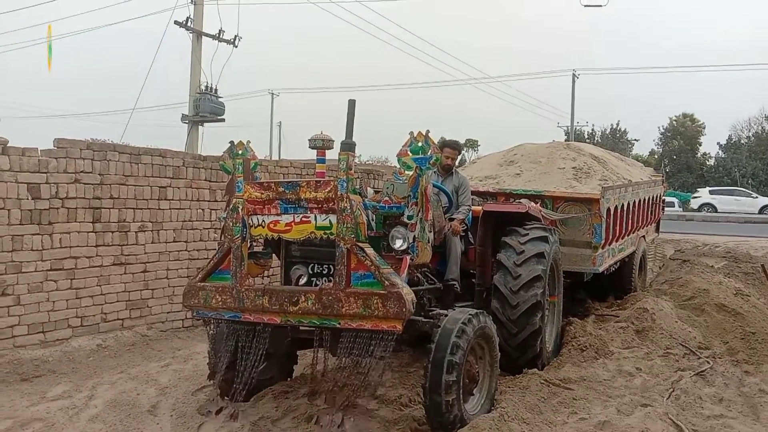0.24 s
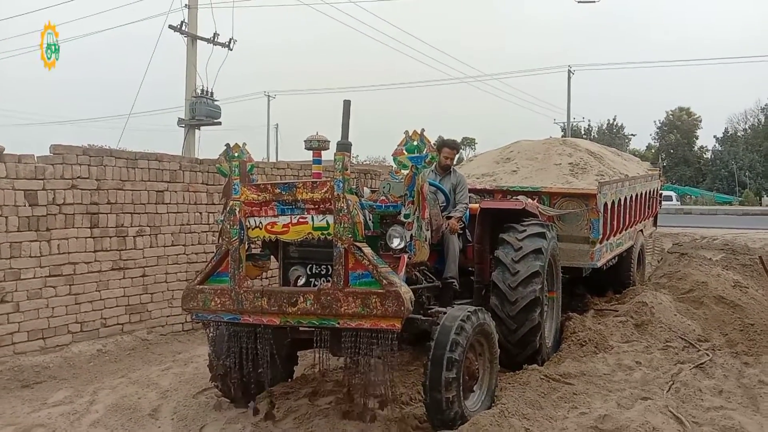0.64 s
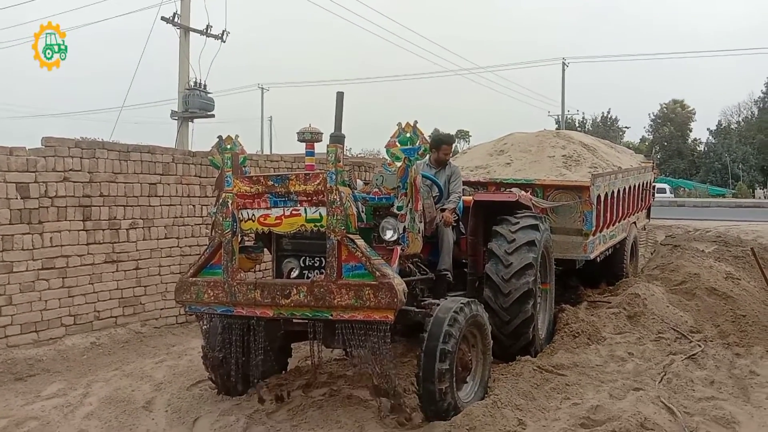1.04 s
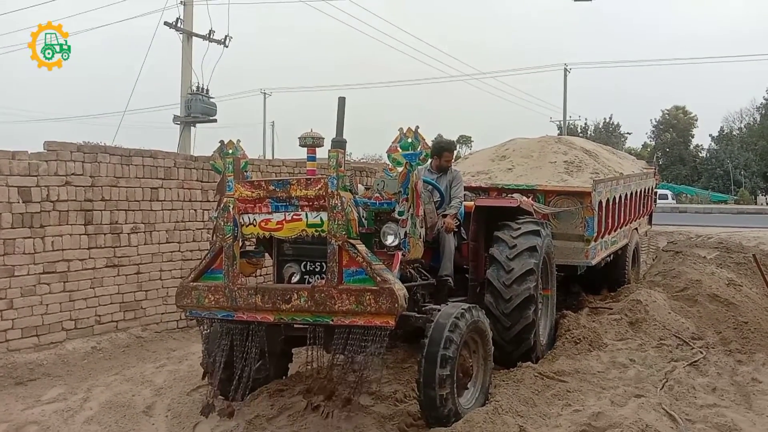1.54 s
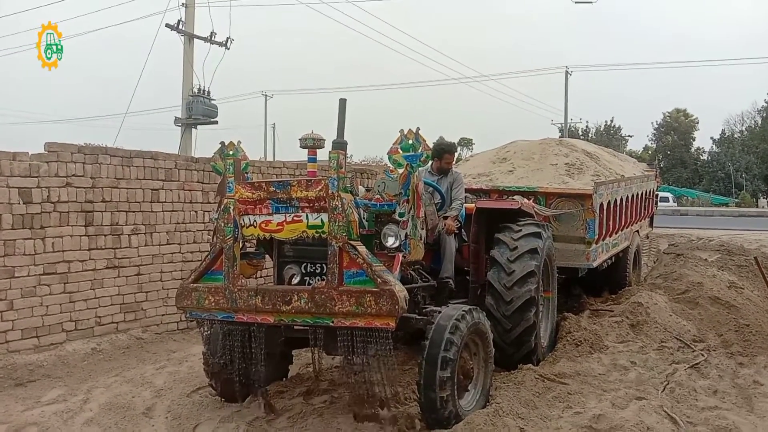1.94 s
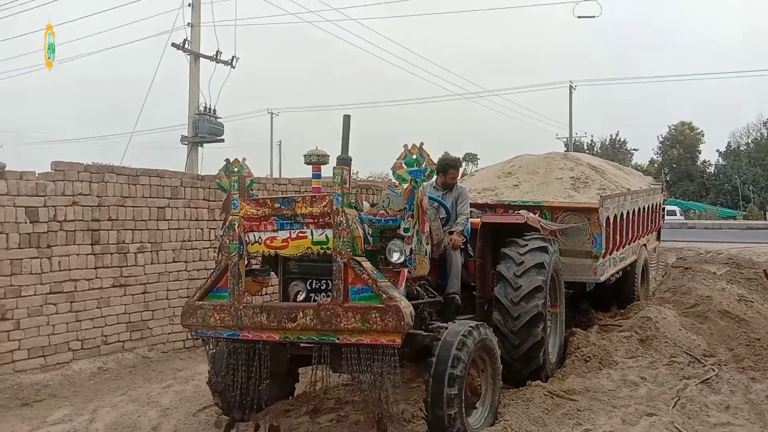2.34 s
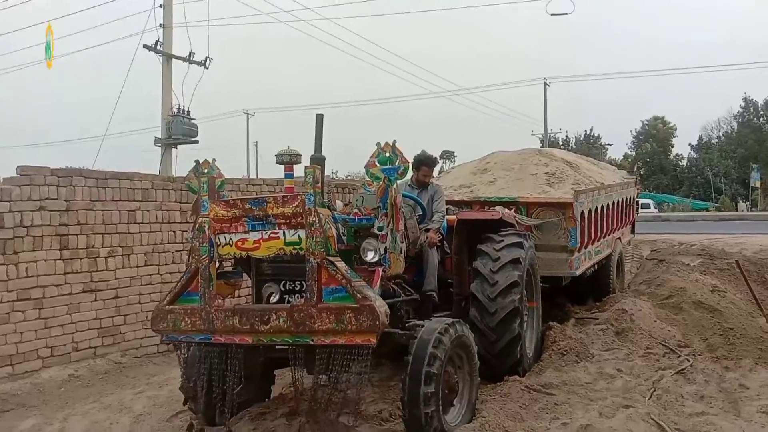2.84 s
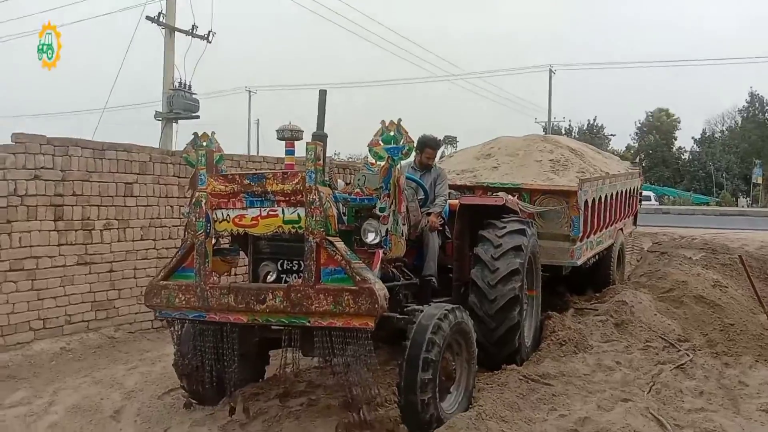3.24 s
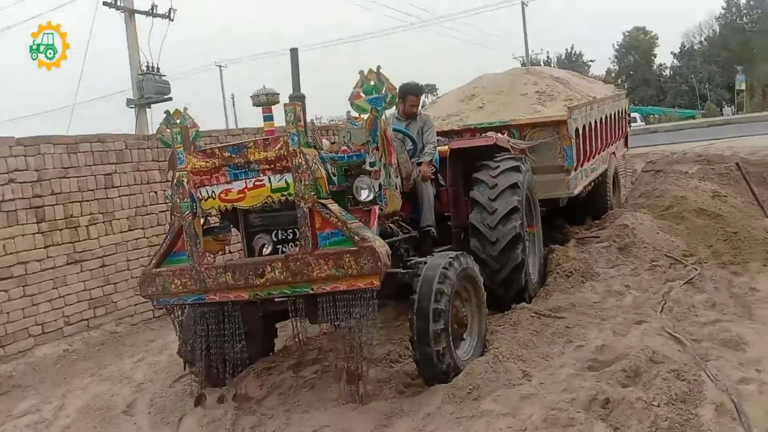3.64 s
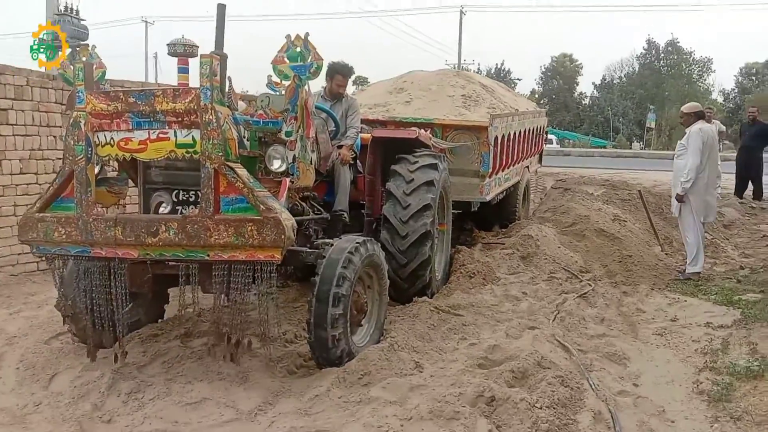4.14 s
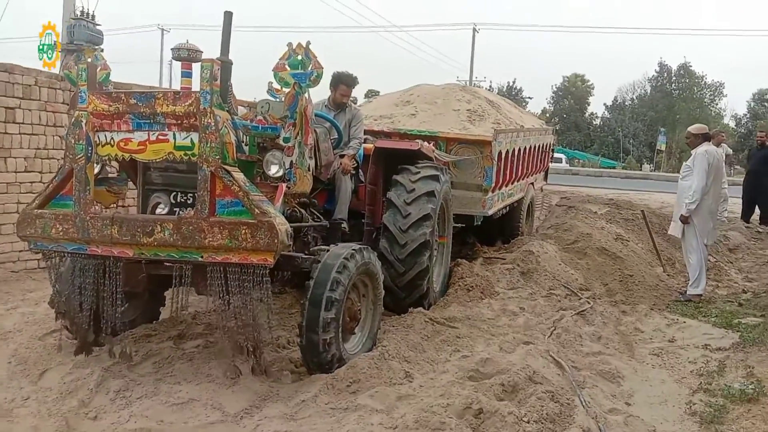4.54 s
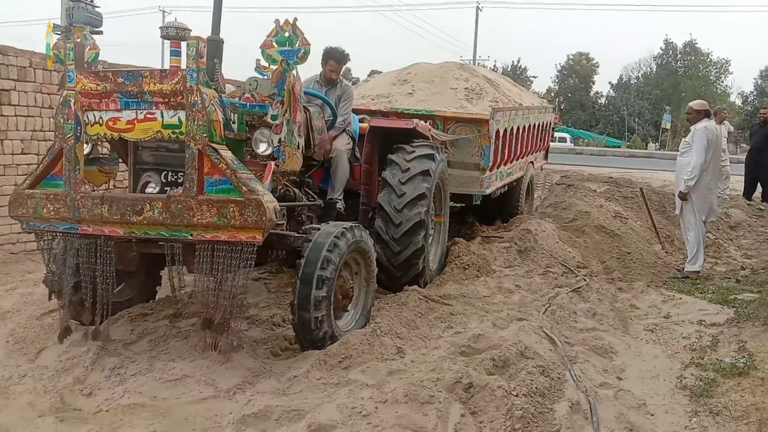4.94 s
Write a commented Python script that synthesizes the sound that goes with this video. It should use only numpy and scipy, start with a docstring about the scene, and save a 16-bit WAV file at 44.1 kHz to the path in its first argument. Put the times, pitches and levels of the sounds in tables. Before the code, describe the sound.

Two rough diesel engine surges outdoors, the second shorter and more abrupt, with dangling chains hissing, rattling and tinkling between and after them.

```python
"""Open sand: a tractor diesel surges twice against a loaded trailer, sinking away each time.
Exhaust: gliding harmonic note, upper overtones shaped by the stack. Block and bonnet: banded noise
with panel resonances. Bumper chains: shaken hiss and stray touches, plus separate ringing clinks.
Brief swelling tones, dull thuds and a faint wash of noise complete the scene."""
import sys
import numpy as np
from scipy import signal
from scipy.fft import rfft, irfft, next_fast_len
from scipy.io import wavfile
from scipy.ndimage import uniform_filter1d

SR = 44100
rng = np.random.default_rng(int(sys.argv[2]) if len(sys.argv) > 2 else 0)


def waveform_to_disk(signal):
    """Save audio, clipped to [-1, 1], as 16-bit WAV at the path in sys.argv[1]."""
    frames = np.transpose(np.atleast_2d(signal))
    scaled = np.clip(frames, -1, 1) * 32767
    samples = np.round(scaled).astype(np.int16)
    wavfile.write(sys.argv[1], SR, samples)


N = 228438

# Exhaust note, one table per surge: time_s, pitch_hz, note_rms_db, octave_rms_db, each_overtone_db (before STACK_RESPONSE)
NOTE_TABLES = [
    [(0.0, 160.7, -35.5, -46, -49), (0.044, 158.4, -27.5, -47, -46), (0.098, 179.5, -26, -52, -48),
     (0.15, 185.8, -19, -56, -46), (0.24, 194.5, -26, -54, -38), (0.348, 184.4, -23, -49, -38),
     (0.46, 178.2, -19.5, -62, -33), (0.54, 171.9, -23, -41.5, -28), (0.614, 163.7, -28.5, -64, -31),
     (0.77, 154.1, -26.5, -37.5, -28), (0.84, 150.8, -30.5, -54.5, -43), (0.92, 149, -32, -47, -35),
     (1.0, 140.7, -38, -56, -50), (1.1, 131.4, -45, -58, -56)],
    [(3.63, 194.3, -59, -62, -45), (3.666, 166, -37, -57, -27), (3.74, 156, -39, -50, -32.5),
     (3.772, 166, -26.5, -60, -24), (3.86, 178.6, -31.5, -64, -34), (3.95, 184, -47, -57, -52),
     (4.056, 180, -22.5, -43.5, -27), (4.15, 182, -45.5, -59, -48), (4.24, 189, -60, -62, -47)],
]
# Brief dips of the note's fundamental; octave and overtones carry on: centre_s, depth_db, half_width_s (to 1/e)
NOTE_DIPS = [(0.19, -14, 0.031), (0.586, -25, 0.015), (0.95, -9, 0.014), (3.813, -39, 0.016),
             (4.008, -20, 0.029)]
# Stack response to the upper overtones: frequency_hz, gain_db
STACK_RESPONSE = [(400, -26), (580, -10), (750, -23), (930, -18), (1100, -12), (1250, -38), (1500, -4.5)]
# Engine load as heard: time_s, roar_db, then over the roar: rumble_db, growl_db, clatter_db
ENGINE_LOAD = [(0.0, -29.5, -9, -10, -2), (0.17, -26.5, -14.5, -8, -4), (0.46, -33, -3, -7, -4.5),
               (0.62, -31, -8.5, -10, -5.5), (0.97, -38.5, -10, -5.5, -2.5), (1.06, -35.5, -5.5, -18.5, -4),
               (1.35, -38.5, -12, -18.5, -7.5), (1.75, -46, -14, -12.5, -6.5), (2.1, -54, -6, -7.5, -6.5),
               (2.5, -63.5, -14, -6, 0), (2.85, -71.5, -16, -1.5, 2.5), (3.3, -65.5, -24, -3.5, 3),
               (3.607, -65.5, -19, -19, 14.5), (3.611, -26, -25, -11.5, 3), (3.69, -29, -7.5, -3, -9),
               (3.87, -30, -6, -2, -4.5), (3.96, -27, -14.5, -5.5, -3.5), (4.12, -27.5, -13, -5.5, -10),
               (4.2, -36.5, -10, -7, -6.5), (4.245, -33, -25, -15, -8), (4.28, -38, -16, -9, -8),
               (4.4, -43, -1, -2.5, -6), (4.45, -41.5, -9, -2.5, -6), (4.55, -44, -11, -6.5, -10.5),
               (4.63, -53.5, -1, 6.5, -10), (4.7, -43, -10.5, -6, -4), (4.78, -48, -10, -3, -8.5),
               (4.84, -57.5, -1, 1.5, 5.5), (4.9, -51.5, -20, -7, -5.5), (5.18, -69.5, -19, 3, 0.5)]
# Roar spectrum before levelling by band: frequency_hz, relative_db_per_hz
ROAR_SPECTRUM = [(18, -74), (30, -34), (106, -2.5), (175, 8.5), (297, -13.5), (579, -12.5), (1100, 8),
                 (1270, 5.5), (1650, 5), (1950, -5), (2420, -14.5), (3550, -12.5), (4960, -28.5),
                 (6140, -48.5), (9000, -54), (11700, -51), (19800, -120)]
# Block and bonnet resonances: frequency_hz, width_hz, gain_over_roar_db
PANEL_MODES = [(136.6, 224, -7.5), (580.4, 90, 10), (972, 46, 7.5), (1260, 118, 13), (1878, 144, 12.5),
               (3086, 500, 3.5), (3800, 120, 2.5), (4827, 47, 12.5), (5470, 680, 8), (2555, 73, -3),
               (6870, 64, 17.5)]
# Chain shaking, rising and falling: time_s, level_db
CHAIN_SHAKE = [(0.0, -26.5), (0.24, -22), (0.47, -28), (0.97, -33.5), (1.0, -30), (1.15, -29),
               (1.34, -34.5), (1.55, -36), (1.62, -39), (1.68, -44.5), (2.15, -46.5), (2.22, -41),
               (2.36, -47.5), (2.8, -53.5), (3.1, -65), (3.19, -68), (3.35, -55), (3.41, -67),
               (3.48, -43.5), (3.58, -51), (3.63, -38), (3.7, -55), (3.92, -38), (4.1, -53), (4.6, -57),
               (4.73, -51), (5.18, -60)]
# Chain hiss spectrum before levelling: frequency_hz, relative_db_per_hz
RATTLE_SPECTRUM = [(1470, -35), (2500, -21), (3080, -25), (4220, -0.5), (5530, 7.5), (6410, -10),
                   (7080, 4.5), (8010, -31), (8520, -7), (11700, 0), (13800, -3.5), (14900, -10),
                   (15800, 20)]
# Chain link modes: frequency_hz, width_hz (unused), weight_db (scaled down in use)
LINK_MODES = [(2646, 16, -12), (3020, 99, -56), (3700, 16, -51), (3930, 51, -1), (3940, 47, -43),
              (5070, 13, -37), (4750, 73, 14), (5570, 19, 1), (6200, 18, -73), (6000, 11.7, 19),
              (6680, 17, -10), (7445, 17, -9.5), (7900, 27, -71), (8200, 15, -38), (8810, 43, 11),
              (9550, 31, 2), (10300, 26, 21), (10900, 220, 9), (11600, 29, -38), (11500, 43, 29),
              (10800, 27, -27), (13600, 110, 7), (14000, 190, -67), (14600, 32, -40), (13900, 48, 7),
              (14900, 76, -13), (14100, 230, 26), (15400, 95, 0)]
# Single clinks: start_s, level_db, low_hz, low_db, mid_hz, mid_db, high_hz, high_db, low_and_mid_t60_s;
# ring dB relative to the clink level, the high ring before its trim
CLINK_EVENTS = [(0.2484, -22, 3650, -9, 5010, -27, 14700, -6, 0.15),
                (0.3584, -21.5, 2970, -18, 6030, -9.5, 14700, -16, 0.15),
                (0.4873, -20, 3300, -6, 4606, -17, 10600, -26, 0.11),
                (0.7968, -24, 3920, -14, 5140, -13, 14800, -8.5, 0.2),
                (0.987, -23, 2734, -9.5, 6950, -22, 15600, -11.5, 0.16),
                (1.137, -19.5, 2800, -21, 5350, -8, 15300, -13, 0.11),
                (1.2984, -29, 2880, -15, 5640, -15, 11800, -8, 0.12),
                (1.421, -31, 3820, -19, 6270, -14.5, 11900, -8, 0.3),
                (1.5861, -25, 3095, -14, 5730, -16, 11700, -7.5, 0.18),
                (1.6084, -29.5, 3000, -18, 5660, -5.5, 14600, -13, 0.11),
                (1.704, -38, 3340, -9, 5490, -13, 11700, -18, 0.14),
                (1.7687, -38.5, 3880, -16, 6400, -15, 15000, -11, 0.19),
                (1.9102, -12, 3620, -12.5, 6590, -12.5, 14800, -10, 0.067),
                (1.9766, -37, 2450, -19, 4980, -16, 15200, -7, 0.13),
                (2.0485, -39, 3900, -14, 5700, -21, 15200, -6, 0.15),
                (2.088, -39, 3380, -22, 5530, -11.5, 10000, -6, 0.2),
                (2.166, -38.5, 3240, -21, 5400, -3.5, 10900, -16, 0.28),
                (2.1834, -32.5, 2630, -24, 5510, -11.5, 12000, -6.5, 0.35),
                (2.2276, -31, 3880, -38, 5670, -7.5, 12360, -5, 0.26),
                (2.2648, -27.5, 3140, -28, 5440, -3.5, 10600, -14, 0.078),
                (2.2982, -37.5, 3120, -21, 5630, -14, 14600, -7, 0.13),
                (2.379, -34.5, 3360, -18, 7280, -7, 14700, -6.5, 0.069),
                (2.3987, -33, 2683, -6.5, 6150, -34, 14700, -6, 0.39),
                (2.4234, -35.5, 3650, -3, 6670, -24, 8720, -21, 0.15),
                (2.4534, -32, 3620, -6, 5070, -18, 15000, -21, 0.18),
                (2.4982, -26, 3660, -18, 5130, -7, 14900, -9.5, 0.1),
                (2.6248, -42, 3730, -7, 5370, -12, 11600, -12, 0.074),
                (2.6485, -38.5, 4370, -18, 6900, -17, 11600, -6, 0.15),
                (2.708, -48, 4370, -3.5, 6100, -21, 12200, -15, 0.36),
                (2.7896, -42.5, 4270, -24, 5660, -12, 12100, -5, 0.18),
                (2.8449, -52, 2730, -11, 5750, -17, 15100, -17, 0.19),
                (2.9083, -41, 4100, -19, 5050, -5.5, 15000, -14, 0.2),
                (2.9634, -43.5, 3650, -12, 4860, -10, 10500, -8, 0.2),
                (3.0114, -46, 3900, -18, 6970, -12, 10500, -6, 0.099),
                (3.0426, -49, 2940, -19, 5030, -10, 14400, -9, 0.15),
                (3.0649, -40, 3650, -10.5, 5150, -11, 10800, -18, 0.12),
                (3.1584, -49.5, 2850, -2, 5140, -17, 14800, -23, 0.27),
                (3.209, -35, 3480, -14, 5080, -10.5, 14100, -10, 0.13),
                (3.245, -33.5, 3910, -16, 5560, -8, 9930, -15, 0.18),
                (3.3232, -38, 2750, -2, 5100, -9, 12100, -23, 0.069),
                (3.333, -30.5, 2750, -9, 5050, -21.5, 12500, -20, 0.22),
                (3.4465, -35.5, 3196, 2, 5430, -7.5, 11500, -14.5, 0.12),
                (3.5218, -40, 3260, -8, 5130, -17, 11100, -21, 0.12),
                (3.5414, -31.5, 3100, -11.5, 5400, -9, 11770, -20, 0.17),
                (3.6086, -14, 3122, -13, 4770, -12, 11700, -26.5, 0.1),
                (3.8642, -25, 3060, -17, 4820, -19, 14910, -17, 0.14),
                (4.1322, -27, 2814, -8, 4504, -26, 11500, -14, 0.15),
                (4.2009, -31.5, 3035, -5.5, 4700, -31, 10500, -33, 0.18),
                (4.366, -38, 4160, -7.5, 4900, -31, 9800, -24, 0.39),
                (4.4777, -35, 2500, -8, 5350, -15.5, 10960, -21, 0.13),
                (4.5106, -40.5, 3600, -5, 5510, -13, 8740, -34, 0.14),
                (4.6369, -35.5, 2610, -9, 5620, -13, 10700, -24, 0.3),
                (4.6584, -37, 2560, -6, 5500, -16, 15100, -13, 0.15),
                (4.6935, -34.5, 3120, -11.5, 5620, -23, 10050, -10.5, 0.18),
                (4.7242, -28, 2774, -10.5, 5100, -13.5, 10700, -14.5, 0.12),
                (4.8454, -31, 2680, -12, 5500, -18, 10400, -19, 0.12),
                (4.9287, -42.5, 3860, -9.5, 5500, -7.5, 15300, -17, 0.22),
                (4.966, -40.5, 3146, -9.5, 5520, -12, 11000, -20, 0.36)]
# Brief tones of engine orders, panels and chain links: centre_s, peak_db, pitch_hz, half_length_s
DRONE_EVENTS = [(0.22, -32, 588, 0.088), (0.237, -30.5, 735, 0.052), (0.308, -28, 1134, 0.027),
                (.6, -30, 1185, 0.097), (0.606, -35, 829, 0.13), (0.855, -37.5, 1257, 0.3),
                (1.046, -25.5, 1227, 0.03), (1.221, -43, 1925, 0.11), (1.314, -35, 1222, 0.082),
                (1.859, -37, 1263, 0.026), (3.144, -57.5, 1240, 0.033), (3.296, -56.5, 1270, 0.075),
                (1.945, -49.5, 1240, 0.09), (2.073, -49, 2010, 0.02), (3.339, -41.5, 3560, 0.011),
                (3.465, -49, 3770, .02), (4.425, -44, 644, 0.032), (4.655, -48, 3240, 0.021),
                (4.759, -51, 5140, 0.016), (2.469, -46.5, 4240, 0.033), (3.354, -57.5, 7300, 0.037),
                (3.595, -41, 3880, 0.013), (3.648, -34, 640, 0.058), (3.699, -33.5, 930, 0.044),
                (3.795, -33, 534.4, 0.069), (3.898, -19.5, 944, 0.017), (3.939, -33, 903, 0.074),
                (3.942, -26.5, 559, 0.044), (3.994, -22.5, 947, 0.021), (3.998, -33, 268.9, 0.061),
                (4, -29, 700, 0.033), (4.089, -32.5, 690, 0.06), (4.249, -41, 672, 0.034),
                (4.382, -43, 940, 0.085), (4.618, -43.5, 624, 0.04), (4.748, -39, 1273, 0.062),
                (4.851, -43.5, 4320, 0.011), (4.925, -51, 1273, 0.087)]
# Dull knocks: centre_s, rms_at_centre_db
THUD_EVENTS = [(2.71, -55), (4.2, -46), (4.63, -43.5)]
# Background wash before levelling: frequency_hz, relative_db_per_hz
QUIET_SPECTRUM = [(18, -48), (30, -8.5), (141, 9), (413, -7), (775, -12), (1120, -30), (1270, -2),
                  (2390, -31), (5120, -11.5), (8420, -48), (15800, -24)]

T, M = np.arange(N) / SR, next_fast_len(N)
FREQ_HZ = np.maximum(np.arange(M // 2 + 1) * SR / M, 1)


def undb(db):
    """Decibels to gain."""
    return 10 ** (np.asarray(db) / 20)


def level(x, rms_db):
    """Scale to an rms level."""
    return x * undb(rms_db) / np.sqrt(np.mean(x ** 2))


def columns(*tables):
    """Each column of the joined tables, interpolated to one value per sample."""
    time_s, *cols = np.concatenate(tables).T
    return [np.interp(T, time_s, col) for col in cols]


def colour(table, hz):
    """Table dB at these frequencies, interpolated over log frequency."""
    table_hz, db = np.transpose(table)
    return np.interp(np.log(hz), np.log(table_hz), db)


def walk(rate_hz):
    """Random levels held about 1 / rate_hz seconds and smoothed twice; spread near 1."""
    hold_ms = int(1000 / rate_hz)
    count = int(N / SR * rate_hz * 1.2) + 2
    held = np.repeat(rng.standard_normal(count), hold_ms)
    smooth = uniform_filter1d(uniform_filter1d(held, hold_ms), hold_ms)
    return 1.3 * np.interp(T * 1000, np.arange(len(held)), smooth)


def bands(shape_db, lo_hz, hi_hz, per_octave):
    """Coloured noise cut into overlapping triangular bands: yields (centre_hz, sound)."""
    noise = rfft(rng.standard_normal(M)) * undb(shape_db)
    octaves = np.log2(FREQ_HZ)
    steps = np.arange(int(per_octave * np.log2(hi_hz / lo_hz)) + 1)
    for hz in lo_hz * 2 ** (steps / per_octave):
        window = np.clip(1 - per_octave * np.abs(octaves - np.log2(hz)), 0, 1)
        yield hz, irfft(noise * window, M)[:N]


def rings(t, hz, db, t60_s, turn=0):
    """Modes that open within a few ms, beat as close pairs and die away; turn is phase in cycles."""
    decay = np.exp(-np.log(1000) * t / t60_s)
    attack = 1 - np.exp(-t / 0.0035)
    beat = 1 + 0.2 * np.cos(2 * np.pi * 0.0057 * hz * t)
    return undb(db) * decay * attack * beat * np.sin(2 * np.pi * (hz * t + turn))


def exhaust():
    """A clean note on the strongest engine order; overtones swell where they cross a stack resonance."""
    hz, note_db, octave_db, over_db = columns(*NOTE_TABLES)
    for s, depth_db, half_s in NOTE_DIPS:
        note_db = note_db + depth_db * np.exp(-((T - s) / half_s) ** 2)
    active = sum((T >= table[0][0]) & (T <= table[-1][0]) for table in NOTE_TABLES)
    gate = uniform_filter1d(active * 1., size=600)
    phase = 2 * np.pi * np.cumsum(hz * (1 + 0.0033 * walk(40))) / SR
    over = 0
    for k in range(3, 9):
        gain = undb(colour(STACK_RESPONSE, k * hz) + 2.2 * walk(15))
        over = over + gain * np.sin(k * phase + 0.047 * walk(22))
    low = undb(note_db) * np.sin(phase) + undb(octave_db) * np.sin(2 * phase)
    return np.sqrt(2) * gate * (low + undb(over_db) * over), phase


def block(phase):
    """Combustion noise rings the panels, throbs with the exhaust note and comes in lumps, band by band."""
    roar_db, rumble_db, growl_db, clatter_db = columns(ENGINE_LOAD)
    lift = 1 + sum((undb(db) - 1) / (1 + (2 * (FREQ_HZ - hz) / width_hz) ** 2)
                   for hz, width_hz, db in PANEL_MODES)
    shape_db = colour(ROAR_SPECTRUM, FREQ_HZ) + 20 * np.log10(lift)
    parts = list(bands(shape_db, lo_hz=30, hi_hz=12000, per_octave=3))
    throb = 1 + .12 * np.cos(phase + walk(25))
    shared_db = .8 * walk(20)
    # the harder the clatter, the higher it reaches
    bright_db_per_octave = 1.9 * np.clip(clatter_db + 10.0, -6, 6.)
    # diesel knock roughens the upper bands
    knock = undb(1.49 * walk(220) + 0.2 * np.cos(phase / 3 + walk(15)))
    out = 0
    for lo_hz, hi_hz, db in ((0, 300, rumble_db), (300, 900, growl_db), (900, 2300, 0.), (2300, SR, clatter_db)):
        part = 0
        for hz, x in parts:
            if lo_hz <= hz < hi_hz:
                tilt_db = bright_db_per_octave * max(np.log2(hz / 4000), 0)
                part = part + x * undb(2.35 * walk(18) + shared_db + tilt_db)
        if lo_hz > 600:
            part = part * knock
        out = out + level(part, 0) * undb(db) * (throb if lo_hz else 1)
    return out * undb(roar_db)


def shaking():
    """Rattle level in dB: the changing shake plus a dying jolt after each clink, summed as power."""
    jolt_db, jolt_t60_s = -6., .1  # jolt level is over the clink's listed high ring
    power = undb(columns(CHAIN_SHAKE)[0]) ** 2
    for s, db, *_, high_db, _t60_s in CLINK_EVENTS:
        i = int(s * SR)
        t = T[i:i + SR // 4] - s
        decay_db = -60 * t / jolt_t60_s
        power[i:i + len(t)] += undb(db + high_db + jolt_db + decay_db) ** 2 * np.clip(t / .003, 0, 1)
    return 10 * np.log10(power)


def rattle(phase):
    """Many links touch at once: a hiss shaken by each firing, and stray touches that ring single modes."""
    shake_db = shaking()
    # the exhaust note is the third multiple of the firing rate
    firing = undb(3.5 * np.cos(phase / 3 + .4 * walk(12)))
    flutter = undb(0.4 * walk(70)) * firing
    parts = bands(colour(RATTLE_SPECTRUM, FREQ_HZ), lo_hz=2000, hi_hz=16100, per_octave=2)
    # the fewer links touch, the patchier the hiss
    patchy_db = np.clip(-.2 * (shake_db + 25), 1.5, 6)
    hiss = flutter * sum(x * undb(patchy_db * walk(40)) for _, x in parts)
    stray = np.zeros(N + SR)
    for when, which, size, force in rng.random(size=(1100, 4)):
        hz, _, weight_db = LINK_MODES[int(which * len(LINK_MODES))]
        t60_s = 840.0 / hz + 0.0052  # thin high modes die first
        i, t = int(when * N), np.arange(int(t60_s * SR / 2)) / SR
        touch_db = shake_db[i] + 0.083 * weight_db - 13.0 * force - 9.0
        stray[i:i + len(t)] += rings(t, hz * (1 + 0.0644 * (size - .5)), touch_db, t60_s)
    return undb(shake_db) * level(hiss, 0.065) + stray[:N]


def clinks():
    """Each clink: a tick, three main rings, and all the other link modes, at random levels, as it bounces."""
    high_t60_s, high_trim_db = 0.053, 2.5
    bounce_s, bounce_loss_db = 0.037, -13  # delay and loss of modes a full bounce late
    out, t = np.zeros(N + SR), np.arange(SR // 5) / SR
    short = SR // 14
    # two links meet
    mode_hz, _, mode_db = np.transpose(LINK_MODES + LINK_MODES)[:, :, None]
    chance = rng.random((len(CLINK_EVENTS), 4, len(mode_hz), 1))
    for (s, db, *row), (pick, turn, size, late) in zip(CLINK_EVENTS, chance):
        low_hz, low_db, mid_hz, mid_db, high_hz, high_db, t60_s = row
        main = rings(t, low_hz, low_db, max(t60_s, .02))
        main += rings(t, mid_hz, mid_db, max(t60_s, .02))
        main += rings(t, high_hz, high_db + high_trim_db, high_t60_s)
        near_db = np.where(mode_hz > 8000, high_db, mid_db)
        rest_db = -8. - 26. * pick + bounce_loss_db * late ** 2 + 0.4 * mode_db + near_db
        # no two links are quite the same size, so the modes shift from clink to clink
        shifted_hz = mode_hz * (1 + 0.063 * (size - .5))
        since = np.maximum(t[:short] - bounce_s * late ** 2, 0)
        main[:short] += rings(since, shifted_hz, rest_db, 150.0 / mode_hz + 0.054, turn).sum(axis=0)
        tick = undb(high_db - 5.5) * np.diff(rng.standard_normal(len(t) + 1)) * np.exp(-t / 0.0025)
        i = int(s * SR)
        out[i:i + len(t)] += undb(db) * (main + tick)
    # the rings flutter as links brush
    return out[:N] * undb(2.5 * walk(110))


def drones():
    """Each brief tone is a sine that swells and fades on a slightly unsteady pitch."""
    out = np.zeros(N)
    phase_wander = 1.48 * walk(30)
    for s, db, hz, half_s in DRONE_EVENTS:
        i = slice(int((s - half_s) * SR), int((s + half_s) * SR))
        swell = np.cos(np.pi / 2 * (T[i] - s) / half_s) ** 2
        out[i] += undb(db) * swell * np.sin(2 * np.pi * hz * T[i] + phase_wander[i])
    return out


def thuds():
    """Short lumps of low noise."""
    bandpass = signal.butter(2, [90, 650], "bandpass", fs=SR, output="sos")
    low = signal.sosfilt(bandpass, rng.standard_normal(N))
    return level(low, 0) * sum(undb(db) * np.exp(-((T - s) / 0.014) ** 2) for s, db in THUD_EVENTS)


def quiet():
    """Faint wash, uneven in each octave band, that stays between the surges."""
    parts = bands(colour(QUIET_SPECTRUM, FREQ_HZ), lo_hz=30, hi_hz=16000, per_octave=1)
    return level(sum(x * undb(1.0 * walk(23)) for _, x in parts), rms_db=-62)


def scene():
    """All sources at one microphone in the open; the sand returns no echo."""
    note, phase = exhaust()
    engine = note + block(phase)
    chains = rattle(phase) + clinks()
    return (engine + chains + drones() + thuds() + quiet())[None]


def record(dry):
    """The phone cuts the top: a steep elliptic low-pass."""
    lowpass = signal.ellip(12, .2, 60, 15550, fs=SR, output="sos")  # ripple dB, stopband dB, edge Hz
    return signal.sosfilt(lowpass, dry)


dry = scene()
out = record(dry)
waveform_to_disk(out)
```